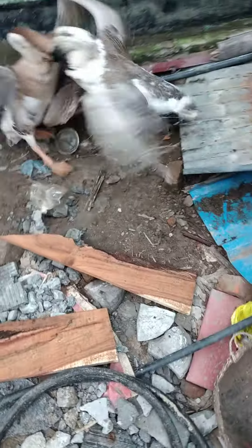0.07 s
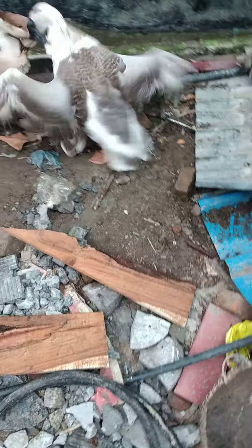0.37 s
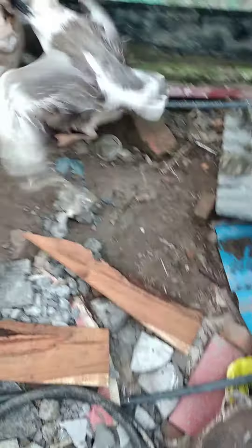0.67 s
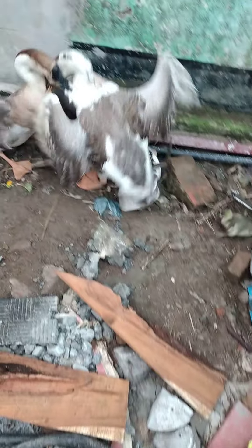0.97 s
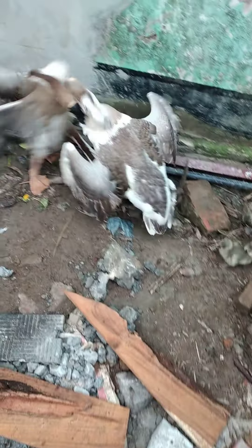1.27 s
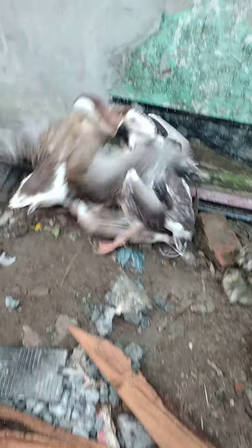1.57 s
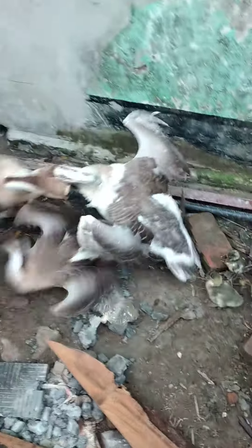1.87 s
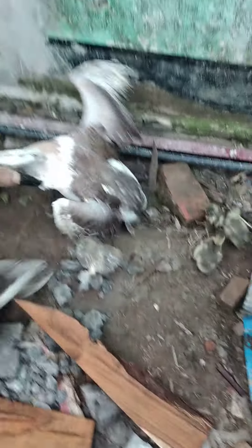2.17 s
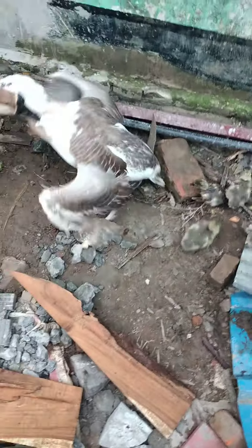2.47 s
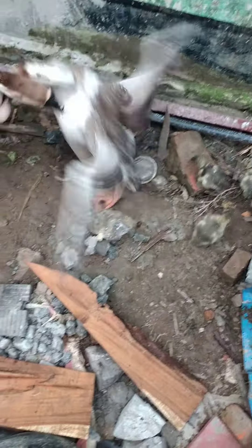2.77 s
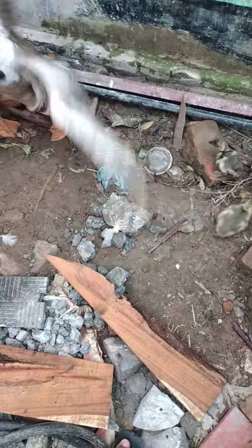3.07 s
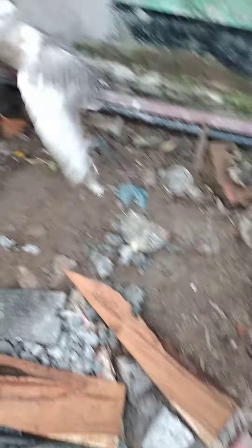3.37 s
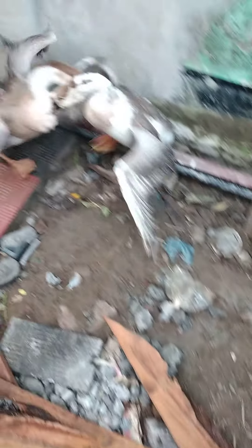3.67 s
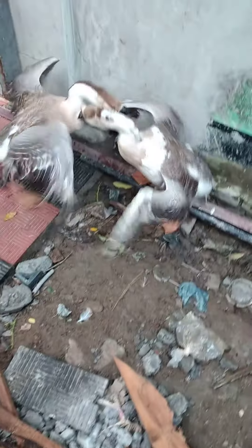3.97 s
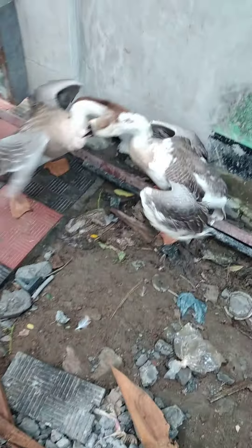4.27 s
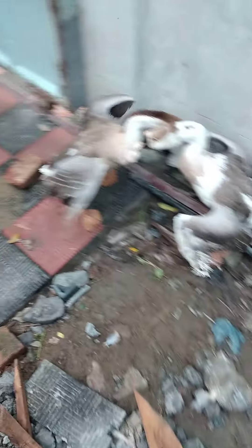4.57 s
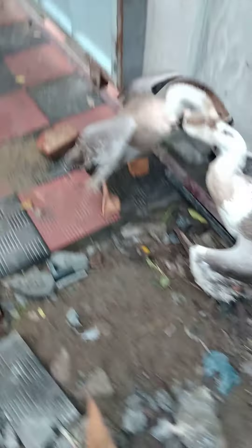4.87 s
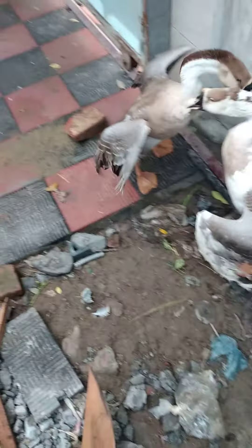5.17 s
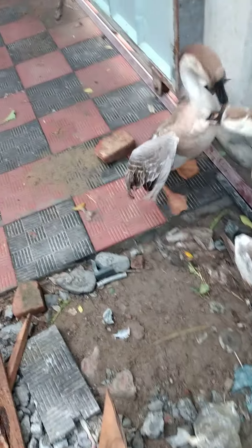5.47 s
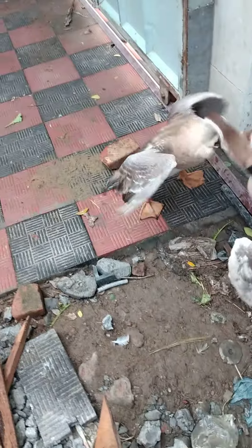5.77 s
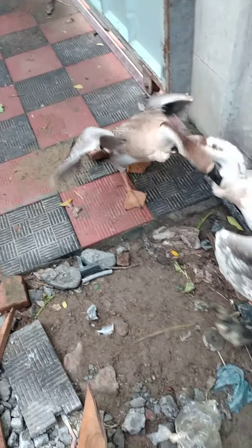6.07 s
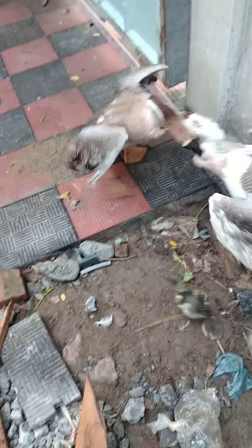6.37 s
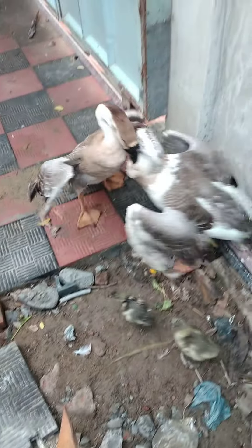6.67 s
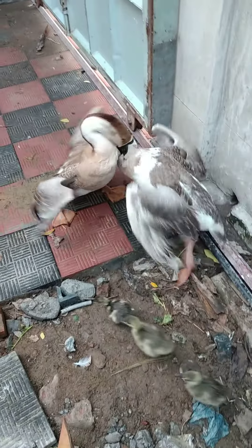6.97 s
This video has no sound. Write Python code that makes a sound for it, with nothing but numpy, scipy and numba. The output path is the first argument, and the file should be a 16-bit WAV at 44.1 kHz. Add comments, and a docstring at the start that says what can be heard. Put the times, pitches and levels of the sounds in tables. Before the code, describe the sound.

Two geese fight in a small yard, wings thumping and swishing amid hoarse cackles, two loud screaming honks and faint gosling peeps.

```python
"""Two geese fight at the foot of a house wall in a small yard, heard from a two-port stereo microphone.
Over a steady hush, wings swish and thump and feet scuff the grit, while one goose cackles hoarsely,
membranes slapping in its windpipe. At 1.5 s a thin shriek breaks up; from 2 s goslings peep close by.
The other goose screams at 2.9 and 4.5 s, loud honks that break from a squeal into a rasp. The struggle
dies down, and three more cackles follow after 6 s. The walls throw it all back."""
import sys
import numpy as np
from scipy import signal
from scipy.fft import rfft, irfft
from scipy.io import wavfile
from scipy.ndimage import uniform_filter1d, minimum_filter1d
from numba import njit

SR = 44100
rng = np.random.default_rng(int(sys.argv[2]) if len(sys.argv) > 2 else 0)


def master_out(mix):
    """Clip the mix to full scale and print it as 16-bit PCM to the path in sys.argv[1]."""
    frames = np.transpose(np.atleast_2d(mix))
    ceiling = np.clip(frames, -1, 1)
    pcm = np.round(ceiling * 32767).astype(np.int16)
    wavfile.write(sys.argv[1], SR, pcm)


N = 313551
TIME = np.arange(N) / SR
VOICE_EDGE_S = .014


def from_db(db):
    """Decibels to gain."""
    return 10 ** (np.asarray(db) / 20)


def rms_one(x):
    """Scale to unit power."""
    return x / np.sqrt(np.mean(x ** 2) + 1e-20)


def levelled(x):
    """Even out the loudness over a few voice cycles."""
    return x / np.sqrt(np.abs(uniform_filter1d(x * x, size=900)) + 1e-12)


def in_time(rows):
    """Each column of a curve at every sample."""
    times, *columns = np.transpose(rows)
    return [np.interp(TIME, times, column) for column in columns]


def at_hz(points, hz):
    """Read a spectrum on a log-frequency axis."""
    f, value = np.transpose(points)
    return np.interp(np.log(np.maximum(hz, 1)), np.log(f), value)


def colour(x, points, size=2048):
    """Causal (minimum-phase) filter with the given dB spectrum."""
    gain = from_db(at_hz(points, np.arange(size // 2 + 1) * SR / size))
    cepstrum = irfft(np.log(gain))
    cepstrum[1:size // 2] *= 2
    cepstrum[size // 2 + 1:] = 0
    return signal.oaconvolve(x, irfft(np.exp(rfft(cepstrum))))[:len(x)]


def band(x, hz, kind="band", order=2):
    """Butterworth filter."""
    return signal.sosfilt(signal.butter(order, hz, kind, fs=SR, output="sos"), x)


def band_noise(low_hz, high_hz):
    """Unit-power noise between two frequencies."""
    return rms_one(band(rng.standard_normal(N), [low_hz, high_hz], order=3))


def drift(rate):
    """A random wander of spread about 1 that turns rate times a second."""
    return np.interp(TIME * rate, np.arange(N // 8), rng.standard_normal(N // 8))


def gate(start, end, edge):
    """1 between two times, with soft edges."""
    inside = np.minimum(TIME - start, end - TIME)
    return np.sin(np.pi / 2 * np.clip(inside / edge + .5, 0, 1)) ** 2


def burst(start, t60, attack):
    """Envelope of one contact: a quick rise and an exponential fall."""
    out, span = np.zeros(N), slice(int(start * SR) + 1, int((start + 2 * t60) * SR))
    age = TIME[span] - start
    out[span] = (1 - np.exp(-age / attack)) * from_db(-60 * age / t60)
    return out


def swell(centre, half_length):
    """A smooth rise and fall around a moment."""
    return np.exp(-((TIME - centre) / half_length) ** 2)


# spectrum of the open air in the yard: f/Hz, level/dB
HUSH = [(20, 4), (45, 5.5), (80, -1.5), (200, -8.5), (500, -7.5), (1000, -12), (2300, -10), (3200, -33.5),
        (14000, -75)]


def background(level_db=-48.5):
    """A steady outdoor hush: the rumble is shared by both microphone ports, the hiss is not."""
    left, other = (rms_one(colour(rng.standard_normal(N), HUSH)) for _ in range(2))
    right = band(left, 520, "low", order=1) + band(other, 560, "high", order=1)
    return from_db(level_db) * np.array([left, right])


# the struggle dies down as the geese lock necks: t/s, wing swish/dB, feather rustle/dB
STRUGGLE_LEVELS = [(0, -29.5, -54.5), (0.55, -44.5, -56), (0.8, -37.5, -56.5), (1.25, -47.5, -58),
                   (1.48, -35.5, -48), (1.88, -33.5, -55.5), (2.2, -49.5, -55.5), (2.62, -39.5, -54),
                   (3.1, -60, -59.5), (3.7, -40, -61), (4.05, -57.5, -66), (5.3, -57.5, -62),
                   (5.5, -72, -79)]
# spectrum of air swept by a wing: f/Hz, level/dB
SWISH_COLOUR = [(60, -16.5), (160, -4.5), (350, -2.5), (600, -11.5), (1000, -15), (2200, -19), (3200, -29),
                (6000, -53.5)]
# spectrum of rubbing feathers and grit: f/Hz, level/dB
RUSTLE_COLOUR = [(500, 1), (2200, -18), (3500, 1.5), (7000, 1), (8500, -8), (11000, -10.5), (14000, -22.5)]


def struggle(rustle_db=-4, flutter_db=3):
    """Wings sweep the air in uneven gusts while feathers and feet rub in clumps of small grains."""
    air_db, rub_db = in_time(STRUGGLE_LEVELS)
    strokes_db = flutter_db * np.tanh(drift(21.92))
    swish = rms_one(colour(rng.standard_normal(N), SWISH_COLOUR)) * from_db(air_db + strokes_db)
    grains = rng.standard_normal(N) * from_db(4 * drift(900) + 3 * np.tanh(drift(50)))
    return swish + rms_one(colour(grains, RUSTLE_COLOUR)) * from_db(rub_db + rustle_db + strokes_db)


# wing blows at the foot of the wall: t/s, level/dB, knock f/Hz, slap hardness/dB
WING_BLOWS = [(0.03, -22, 450, -9), (0.069, -26.5, 330, -6), (0.236, -26.5, 330, 6.5),
              (0.519, -27, 300, -4), (0.729, -33, 400, -12.5), (1.372, -21, 450, -1.5),
              (1.531, -21.5, 407, -17), (1.702, -26, 300, 3), (1.713, -26.5, 447, -13.5),
              (1.827, -33, 600, -1.5), (1.991, -32, 500, 14), (2.053, -24.5, 450, 15.5),
              (2.21, -28, 700, 14), (2.217, -25, 700, 3), (2.333, -28, 700, 11), (2.683, -31.5, 650, -0.5),
              (2.725, -29.5, 500, 16), (2.79, -20.5, 600, -8), (2.885, -17, 350, -1), (3.583, -53, 500, 29),
              (3.717, -31, 500, 14.5), (3.743, -34.5, 450, 2.5), (5.299, -39.5, 280, -5)]


def wing_blows(knock_db=2, slap_db=7, rub_db=-21, slap_decay_share=0.26):
    """A wing lands on body or ground with a padded knock and a shorter slap of feathers, which rub."""
    knocks, slaps, rubs = np.zeros((3, N))
    for start, db, hz, hard_db in WING_BLOWS:
        t60 = 0.084 * .5 ** (hard_db / 6.5)  # the harder the slap, the shorter the contact
        knocks += band_noise(hz / 2, hz * 1.51) * from_db(db + knock_db) * burst(start, t60, 0.0005)
        slaps += from_db(db + hard_db + slap_db) * burst(start, t60 * slap_decay_share, 0.001)
        rubs += from_db(db + hard_db + rub_db) * burst(start, t60, 0.0036)
    slaps *= band_noise(900, 2500)
    rubs *= rms_one(colour(rng.standard_normal(N), RUSTLE_COLOUR))
    return knocks + slaps + rubs


# low, dull thumps of air pushed by a wing: t/s, f/Hz, level/dB
WING_THUMPS = [(.043, 263, -11.5), (0.516, 178, -10), (1.376, 160, -17), (1.394, 131, -13),
               (1.733, 222, -11), (2.055, 305, -16), (2.218, 163, -16.5), (2.889, 153, -10.5)]


def wing_thumps(cycles=6):
    """Air pushed by a wing hits the microphone with a low, dull thump that dies within a few cycles."""
    return sum(from_db(db) * burst(start, cycles / hz, 0.0005) * np.sin(2 * np.pi * hz * (TIME - start))
               for start, hz, db in WING_THUMPS)


# feather shafts and grit snapping: t/s, level/dB
QUILL_SNAPS = [(0.048, -29), (0.5326, -32), (1.401, -29), (1.701, -35.5), (1.7396, -33), (2.2102, -36),
               (2.366, -41.5), (3.5846, -33)]
# spectrum of a snap: f/Hz, gain/dB
QUILL_COLOUR = [(200, -19), (1000, 28.5), (2200, 28), (3300, 15), (7000, 5), (11000, -5), (15000, -22)]


def snaps(gain_db=-3.5, t60=0.018, grain_db=5):
    """Stiff quills and bits of grit crack in short grainy bursts."""
    grains = rms_one(rng.standard_normal(N) * from_db(grain_db * drift(1100)))
    envelope = sum(from_db(db + gain_db) * burst(start, t60, 0.0001) for start, db in QUILL_SNAPS)
    return colour(grains * envelope, QUILL_COLOUR)


@njit
def resonate(x, hz, width):
    """A resonance whose centre and width move; gain 1 on top."""
    y, radius = np.zeros(len(x)), np.exp(-np.pi * width / SR)
    for i in range(2, len(x)):
        r = radius[i]
        feedback = 2 * r * np.cos(2 * np.pi * hz[i] / SR) * y[i - 1] - r * r * y[i - 2]
        y[i] = (1 - r * r) / 2 * (x[i] - x[i - 2]) + feedback
    return y


def pulses(phase):
    """One sharp closure per cycle, placed between samples; unit power."""
    samples_away = np.abs((phase + .5) % 1 - .5) / np.gradient(phase)
    return rms_one(band(np.maximum(0, 1 - samples_away), 50, "high"))


def bill_ring(x, hz=5360, width_hz=140, gain_db=2.5):
    """The high, narrow resonance of the open bill."""
    return from_db(gain_db) * resonate(x, np.full(N, hz), np.full(N, width_hz))


# breaks into the high register, both geese: t/s, length/s, start f/Hz, crest f/Hz, share of voice/0-1
REGISTER_BREAKS = [(.865, .04, 790, 850, .7), (1.335, .05, 860, 880, .7), (2.885, .07, 540, 585, .7),
                   (4.465, .1, 515, 592, .72), (6.575, .04, 880, 870, .55)]


def syrinx(pitch, rough, jitter, rasp, thin_above_hz=640):
    """Membranes slap with puffs of air, unevenly when strained; at times they flip into a squeal."""
    phase = np.cumsum(pitch * (1 + jitter * rough * drift(200) + .015 * drift(40))) / SR
    slaps = pulses(phase) * from_db(rough * drift(190))
    air = rms_one(rng.standard_normal(N) * np.exp(-3 * (phase % 1)))
    low_register = levelled(slaps + rasp * 2 * rough ** 2 * air)
    share, squeal_hz = np.zeros(N), np.full(N, 600.)
    for start, length, start_hz, crest_hz, amount in REGISTER_BREAKS:
        share += amount * gate(start, start + length, 0.0081)
        arch = np.sin(2.2 * np.clip((TIME - start) / length, 0, 1))
        squeal_hz = np.where(TIME > start - .012, start_hz + (crest_hz - start_hz) * arch, squeal_hz)
    squeal = pulses(np.cumsum(squeal_hz * (1 + .017 * drift(400))) / SR)
    squeal = np.where(squeal_hz > thin_above_hz, band(squeal, 1100, "high"), squeal)
    return np.sqrt(1 - share) * low_register + np.sqrt(share) * squeal


def throat(source, rough, hz, width_hz, ring_db, treble_db, upper_gain=0):
    """Up to two resonances move with the beak, and the bill rings thinly; a clear voice rings more."""
    voice = source + from_db(2 * ring_db * (1.5 - rough)) * resonate(source, hz, width_hz)
    voice += upper_gain * resonate(source, 1.29 * hz, 2 * width_hz)
    voice += (1 - rough) * bill_ring(source)
    body = levelled(band(voice, 2920, "low", order=4))
    treble = levelled(band(voice, 3260, "high", order=4))
    return body + from_db(treble_db) * treble


def latest_call(table):
    """At every sample: the latest call's age, whether it sounds, its length and its other columns."""
    rows = np.array(table)
    latest = np.maximum(np.searchsorted(rows[:, 0], TIME + VOICE_EDGE_S) - 1, 0)
    start, length, *columns = rows[latest].T
    return np.clip(TIME - start, 0, length), gate(start, start + length, VOICE_EDGE_S), length, *columns


# hoarse cackles: t/s, length/s, level/dB, swell/dB, crest/share of length, pitch f/Hz,
# first throat f/Hz, held throat f/Hz, roughness/0-1, settling/s, upper resonance/dB, treble/dB,
# left over right/dB, delay at the left port/ms
HOARSE_CALLS = [(0.476, 0.15, -26.5, 2, 0.65, 143.1, 2000, 1310, 0.41, 0.041, -1, -26, 0, -0.058),
                (0.875, 0.24, -17, 7, 0.26, 148.7, 1660, 1357, 0.25, 0.048, 6, -26, 1, 0.0056),
                (1.348, 0.2, -22.5, 7.5, 0.34, 148.8, 2570, 1320, 0.58, 0.069, -10, -25.5, -1.5, -0.09),
                (6.2, 0.22, -20.5, 6, 0.53, 147, 834, 1400, 0.9, 0.075, -6, -22.5, -1, 0.16),
                (6.586, 0.27, -18, 8.5, 0.41, 160.7, 1911, 1388, 0.31, 0.088, -12, -20.5, -1, -0.726),
                (7.028, 0.21, -13, 24, 0.3, 164.1, 1225, 1467, 0.01, 0.026, -23, -28, -2.5, -0.8)]
# windpipe of the cackling goose: f/Hz, gain/dB
CACKLER_WINDPIPE = [(100, -22), (160, -5.5), (280, -17), (480, -10.5), (640, 0), (900, -6), (1350, -0.5),
                    (1720, -4.5), (2080, -5), (2700, -12.5), (3050, -19.5), (3900, -20), (5300, -21),
                    (6100, -25.5), (9000, -38.5), (15000, -59)]


def cackler(gain_db=-1.25, waver_db=1.5, scoop=.06, onset_rough=.57, clear_hz=90, rough_hz=250):
    """Each cackle is a wavering arch of loudness; it starts flat and rough, then the voice settles."""
    (age, sounding, length, peak_db, swell_db, crest, held_pitch, first_hz, held_hz,
     held_rough, settle_s, upper_db, treble_db, _, _) = latest_call(HOARSE_CALLS)
    unsettled = np.exp(-(age / settle_s) ** 2)
    loud_db = gain_db + peak_db - swell_db * (2 * (age / length - crest)) ** 2 + waver_db * drift(70)
    pitch = held_pitch * (1 - scoop * unsettled)
    rough = held_rough + onset_rough * unsettled * (1 - held_rough)
    throat_hz = held_hz + (first_hz - held_hz) * unsettled ** 2
    width_hz = clear_hz + (rough_hz - clear_hz) * rough
    source = colour(syrinx(pitch, rough, jitter=.06, rasp=1.25), CACKLER_WINDPIPE)
    voice = throat(source, rough, throat_hz, width_hz, ring_db=8.5, treble_db=treble_db,
                   upper_gain=from_db(upper_db))
    return sounding * from_db(loud_db) * voice


def panned(left, right, db):
    """Set the left port's level against the right."""
    return np.array([left * from_db(db / 2), right * from_db(-db / 2)])


def cackler_moves(left, right):
    """The goose moves from call to call, which changes level and arrival time at the microphone."""
    *_, pan_db, delay_ms = latest_call(HOARSE_CALLS)
    delay = np.round(delay_ms * SR / 1000).astype(int)
    return panned(left[np.clip(np.arange(N) - delay, 0, N - 1)], right, pan_db)


# scuffs on the yard floor: t/s, half length/s, level/dB
GRIT_SCUFFS = [(0.57, 0.072, -52.5), (1.155, 0.0042, -42.5), (1.396, 0.039, -44.5), (1.749, 0.0046, -38),
               (2.33, 0.023, -61), (3.958, 0.015, -53), (4.352, 0.027, -60.5)]


def scuffs(grain_db=6, clump_db=3):
    """A foot or a wing tip drags over the grit: a short swell of tiny clumped cracks."""
    grains = rng.standard_normal(N) * from_db(grain_db * drift(1500) + clump_db * drift(120))
    envelope = sum(from_db(db) * swell(centre, half_length) for centre, half_length, db in GRIT_SCUFFS)
    return rms_one(colour(grains, RUSTLE_COLOUR)) * envelope


# course of one shriek, almost straight ahead of the microphone: t/s, f/Hz, level/dB, brokenness/0-1
SHRIEK_COURSE = [(1.485, 1326, -24, 0.41), (1.52, 1411, -22.5, 0.01), (1.543, 1438, -26, 0.37),
                 (1.548, 1393, -14, 0.52), (1.579, 1373, -16.5, 0.97), (1.613, 1345, -21, 0.92),
                 (1.634, 1283, -30, 0.94), (1.662, 1253, -32, 1)]
# windpipe of the goose that shrieks and screams: f/Hz, gain/dB
SCREAMER_WINDPIPE = [(100, -34), (175, -6.5), (280, -32.5), (450, -19), (620, 5), (810, -7.5), (1150, 5),
                     (1750, 5.5), (2300, -1.5), (3100, -12), (4500, -18), (7000, -27), (9000, -46.5),
                     (15000, -46.5)]


def shriek(throat_hz=2080, width_hz=650, leak_db=-12, jitter=.06, shimmer_db=5):
    """A thin arching note; as it breaks, the membranes slap unevenly and in twos and fours."""
    pitch, loud_db, broken = in_time(SHRIEK_COURSE)
    phase = np.cumsum(pitch * (1 + jitter * (.1 + broken ** 2) * drift(350))) / SR
    pattern = 1 + 2 * broken * np.cos(np.pi * phase) + 2 * broken ** 2 * np.cos(np.pi * phase / 2)
    slaps = pulses(phase) * pattern * from_db(shimmer_db * broken * drift(700))
    source = colour(slaps, SCREAMER_WINDPIPE)
    voice = resonate(source, np.full(N, throat_hz), np.full(N, width_hz))
    voice += from_db(leak_db) * (source + 3 * bill_ring(source))
    sounding = gate(SHRIEK_COURSE[0][0], SHRIEK_COURSE[-1][0], VOICE_EDGE_S)
    return sounding * from_db(loud_db) * levelled(voice)


def hoot(hz=425, level_db=-25):
    """One short hollow tone in the scuffle."""
    return from_db(level_db) * swell(centre=1.9, half_length=.024) * np.sin(2 * np.pi * hz * TIME)


# goslings near the microphone: t/s, rise/s, fall/s, top f/Hz, shoulder f/Hz, end f/Hz, level/dB,
# jitter/share of pitch, overtone boost/dB
GOSLING_PEEPS = [(1.975, .062, .18, 3560, 2920, 2750, -37, .02, 6),
                 (2.46, .065, .035, 3350, 3000, 2900, -41, .012, 5),
                 (2.555, .057, .12, 3740, 2800, 2550, -36.5, .012, 2),
                 (4.058, .065, .145, 4050, 3800, 2150, -44, .13, 0),
                 (5.03, .08, .08, 4000, 3750, 2900, -47, .035, 0),
                 (5.145, .053, .23, 3850, 3450, 2450, -39, .035, 2),
                 (5.575, .078, .155, 3980, 3680, 2050, -37, .04, -2),
                 (5.68, .05, .12, 3330, 2850, 2600, -46, .025, 2),
                 (6.098, .075, .015, 3950, 3900, 3800, -44, .03, 2)]


def goslings(start_hz=2150, shoulder_s=.03, octave_db=-18, half_db=-27, fade_db=5, quaver_db=3):
    """Each peep is a quavering whistle that leaps up, sinks to a held shoulder and drops away."""
    out = np.zeros(N)
    for start, rise, fall, top_hz, shoulder_hz, end_hz, level_db, jitter, boost_db in GOSLING_PEEPS:
        span = slice(int(start * SR), int((start + rise + fall) * SR))
        t = TIME[span] - start - rise
        climbing, dropping = (np.minimum(t, 0) / rise) ** 2, (np.maximum(t, 0) / fall) ** 3
        settled = 1 - np.exp(-(np.maximum(t, 0) / shoulder_s) ** 2)
        pitch = top_hz + (start_hz - top_hz) * climbing + (shoulder_hz - top_hz) * settled
        pitch += (end_hz - shoulder_hz) * dropping
        strain = jitter * (1 - climbing - dropping)  # a strained peep thins to a rasp at its top
        pitch *= 1 + strain * drift(1800)[span] + .011 * drift(70)[span]
        phase = 2 * np.pi * np.cumsum(pitch) / SR
        overtones = from_db(octave_db) * np.sin(2 * phase)
        overtones += from_db(half_db) * (settled * np.sin(1.5 * phase) + .4 * np.sin(3 * phase))
        whistle = np.sin(phase) + from_db(boost_db) * overtones
        loss_db = 70 * strain + fade_db * (0.5 + climbing + settled + 2 * dropping)
        loudness = from_db(level_db - loss_db + quaver_db * drift(90)[span])
        out[span] += whistle * loudness * signal.windows.tukey(len(t), .08)
    return out


# loud screams: t/s, length/s, attack/s, level/dB, pitch f/Hz, first throat f/Hz, last throat f/Hz,
# roughness/0-1, first treble/dB, last treble/dB, crack/0-1
LOUD_CALLS = [(2.876, 0.198, 0.054, -8, 175, 1120, 2160, .6, -31, -14, .45),
              (4.461, .26, 0.045, -6, 173.6, 1126, 1730, 0.56, -35.5, -11, 0.94)]


def screamer(gain_db=-4, bright_db=4.5, release_s=.016,
             crack_s=.045, glide_s=.008, crack_throat_hz=2135, crack_pitch_hz=177.8):
    """The opening beak raises resonance and treble until the scream cracks into a brassy ring."""
    (age, sounding, length, attack, peak_db, held_pitch, first_hz, last_hz,
     held_rough, first_db, last_db, crack_depth) = latest_call(LOUD_CALLS)
    opening = age / length
    strain = opening - .5  # pitch and roughness climb with it
    crack = crack_depth * np.clip((age - length + crack_s) / glide_s, 0, 1)
    starting = np.maximum(1 - age / attack, 0)
    dying = np.maximum(1 - (length - age) / release_s, 0)
    loud_db = gain_db + peak_db - 8 * starting - 12 * dying
    treble_db = bright_db + first_db + (last_db - first_db) * opening + 9 * dying
    throat_hz = (first_hz + (last_hz - first_hz) * opening) * (1 - crack) + crack_throat_hz * crack
    pitch = held_pitch * (1 + .045 * strain) * (1 - crack) + crack_pitch_hz * crack
    width_hz = 300 * (1 - crack) + 110 * crack
    rough = held_rough * (1 + .5 * strain) * (1 - .75 * crack ** 2)
    source = colour(syrinx(pitch, rough, jitter=.05, rasp=.8), SCREAMER_WINDPIPE)
    voice = throat(source, rough, throat_hz, width_hz, ring_db=5, treble_db=treble_db)
    return sounding * from_db(loud_db) * voice


def hiss(gain_db=-20, t60=0.28, lead_s=0.025):
    """Air rushes through the wide-open beak as each scream cracks, and outlasts the voice."""
    flow = sum(from_db(db + gain_db) * burst(start + length - lead_s, t60, 0.022)
               for start, length, _, db, *_ in LOUD_CALLS)
    return flow * band_noise(2100, 7000)


# echoes off ground and walls: left arrival t/ms, right arrival t/ms, level/dB
WALL_ECHOES = [(3.302, 2.9, -6.5), (7.4, 5.1, -8.5)]
# sound lingering between the walls: f/Hz, t60/s
WALL_DECAY = [(1800, 0.98), (8000, 0.82), (15000, 0.38)]


def yard(x, near_db, tail_db, near_t60, lag_ms=.29):
    """Direct sound, two echoes, scatter from the near walls and a faint tail reach the two ports."""
    t = TIME[:SR]
    response = np.zeros((2, SR))
    for left_ms, right_ms, db in [(1 + lag_ms, 1, 0), *WALL_ECHOES]:
        arrival = np.sinc(np.arange(SR) - np.array([[left_ms], [right_ms]]) * SR / 1000)
        response += from_db(db) * (band(arrival, 570, "high") if db else arrival)  # echoes lack bass
    edges = np.geomspace(80, 16000, 9)
    for low, high in zip(edges, edges[1:]):
        hz = np.sqrt(low * high)
        alike = 1 / (1 + (hz / 500) ** 2)  # long waves reach both ports alike
        mid, side = band(rng.standard_normal((2, SR)), [low, high])
        near = rms_one(from_db(-60 * t / near_t60) * (t > .004))
        tail = rms_one(from_db(-60 * t / at_hz(WALL_DECAY, hz)) * (t > .02))
        field = np.sqrt((1 + alike) / 2) * mid + np.sqrt((1 - alike) / 2) * side * [[1], [-1]]
        response += field * (from_db(near_db) * near + from_db(tail_db) * tail) / np.sqrt(SR)
    return signal.fftconvolve(x[None], response, axes=1)[:, :N]


def scene():
    """Voices and scuffle by the wall; the goslings are closer to the microphone and drier."""
    cackles = cackler_moves(*yard(cackler(), near_db=-2, tail_db=-13, near_t60=.17))
    screams = panned(*yard(screamer() + hiss(), near_db=-1, tail_db=-15, near_t60=.14), db=-1.5)
    shrieks = yard(shriek(), near_db=-4, tail_db=-18, near_t60=.13, lag_ms=.05)
    peeps = yard(goslings(), near_db=-11, tail_db=-21, near_t60=.15)
    scuffle = wing_blows() + wing_thumps() + snaps() + scuffs() + struggle() + hoot()
    fight = yard(scuffle, near_db=-6.5, tail_db=-12, near_t60=.12, lag_ms=.17)
    return background() + fight + cackles + shrieks + peeps + screams


def limiter(x, ceiling=0.96):
    """The gain dips smoothly for a moment around any peak above the ceiling."""
    gain = np.minimum(1, ceiling / (np.abs(x).max(axis=0) + 1e-9))
    return x * uniform_filter1d(minimum_filter1d(gain, size=80), size=80)


# balance of the microphone's ports: f/Hz, left over right/dB
MIC_BALANCE = [(1000, 1), (1600, 2.5), (2500, 8.5), (3500, 1.5), (5500, 2.5), (8500, 11), (10000, -20),
               (13000, -5)]


def record(dry, cutoff_hz=15800):
    """The two microphone ports colour the treble differently; peaks are held down, the top is cut."""
    ports = np.array([colour(x, [(hz, sign * db / 2) for hz, db in MIC_BALANCE])
                      for x, sign in zip(dry, (1, -1))])
    return signal.sosfilt(signal.ellip(10, .1, 70, cutoff_hz, fs=SR, output="sos"), limiter(ports))


dry = scene()
out = record(dry)
master_out(out)
```